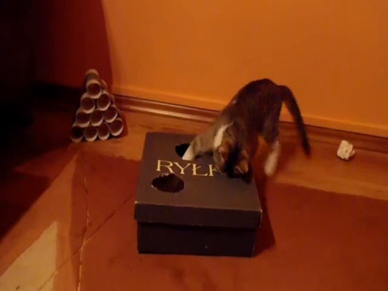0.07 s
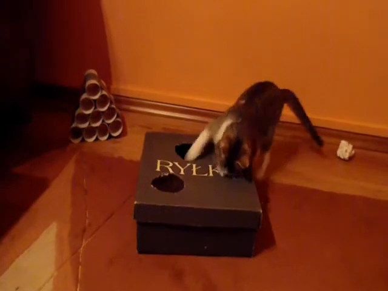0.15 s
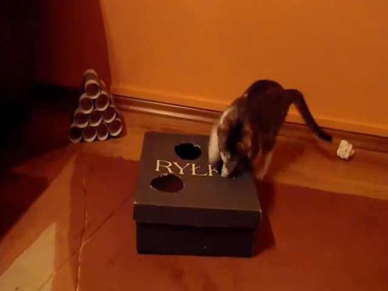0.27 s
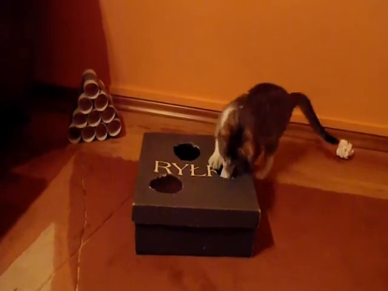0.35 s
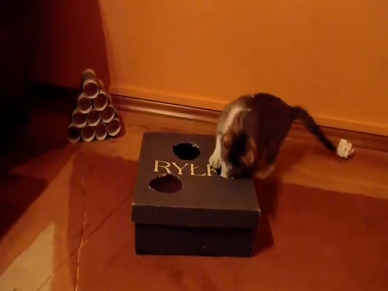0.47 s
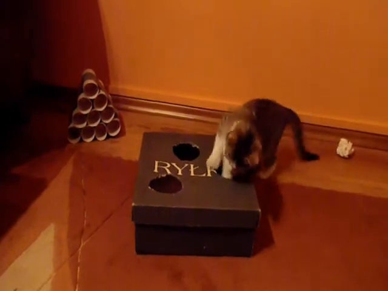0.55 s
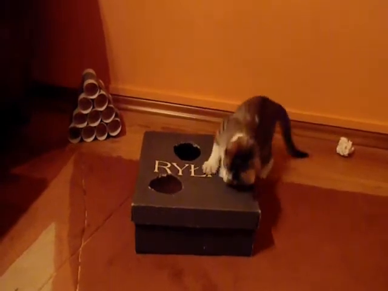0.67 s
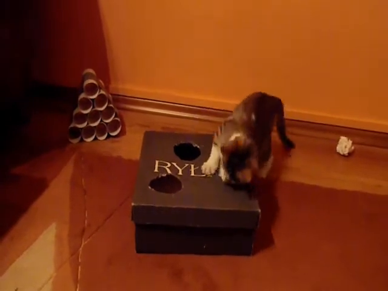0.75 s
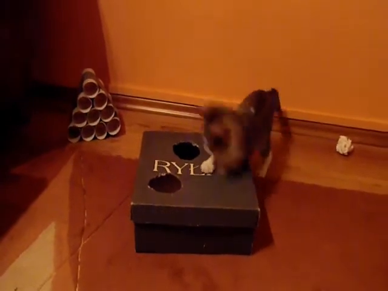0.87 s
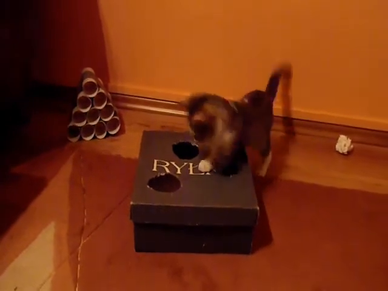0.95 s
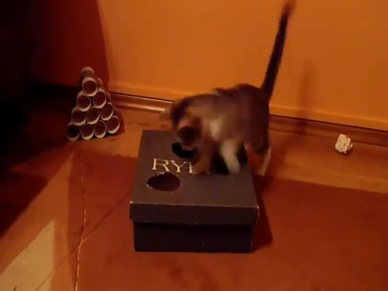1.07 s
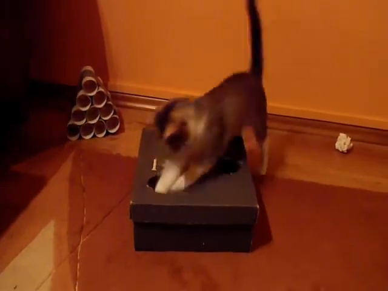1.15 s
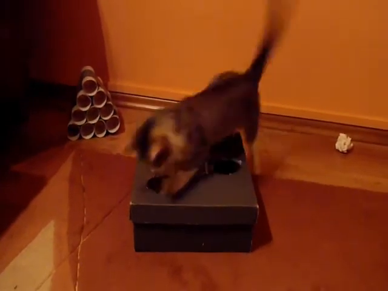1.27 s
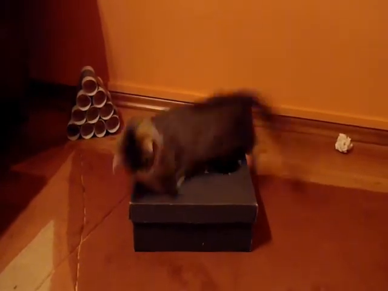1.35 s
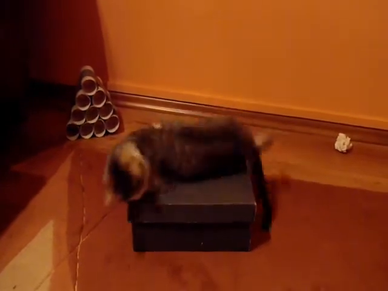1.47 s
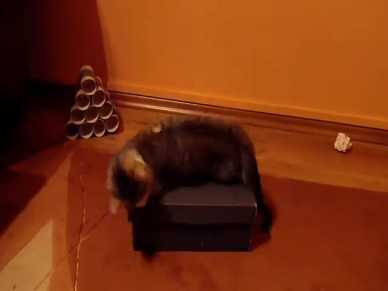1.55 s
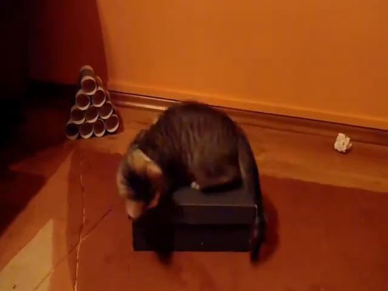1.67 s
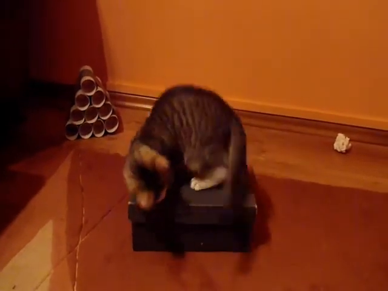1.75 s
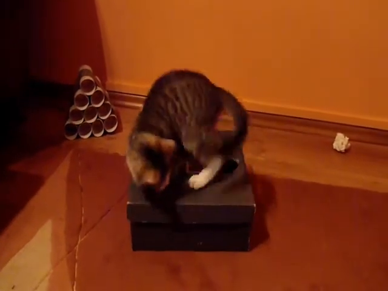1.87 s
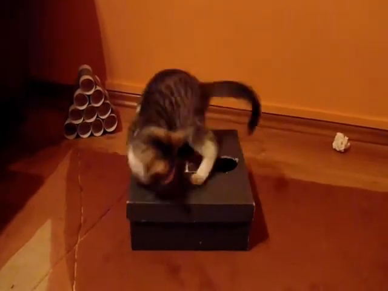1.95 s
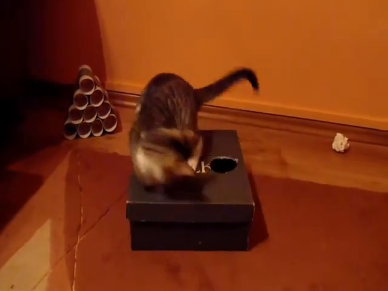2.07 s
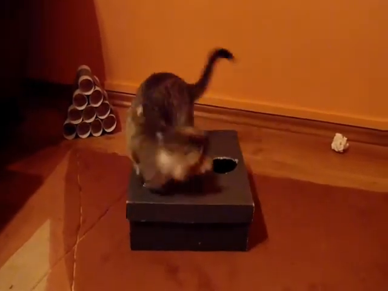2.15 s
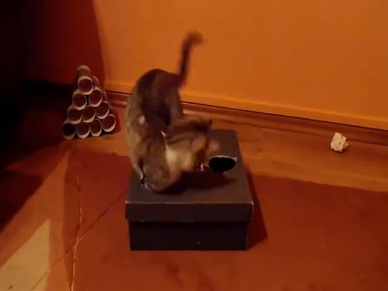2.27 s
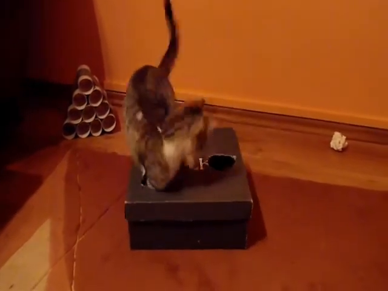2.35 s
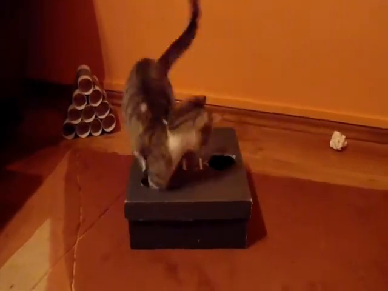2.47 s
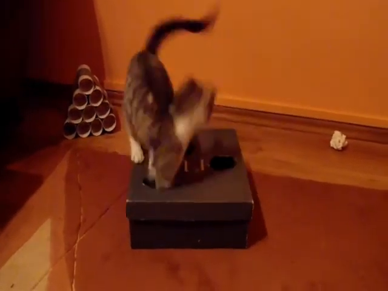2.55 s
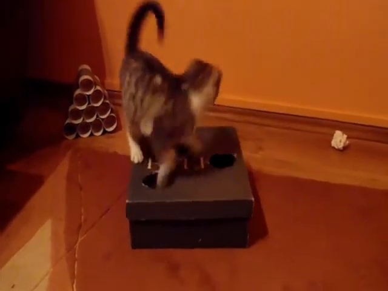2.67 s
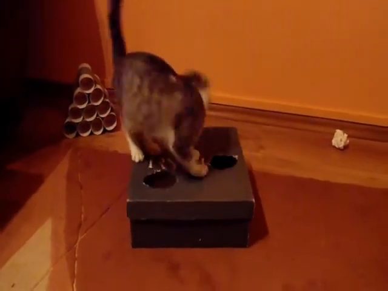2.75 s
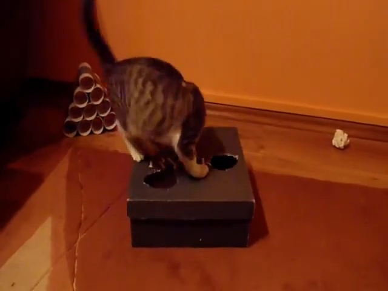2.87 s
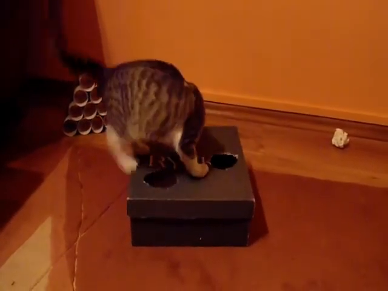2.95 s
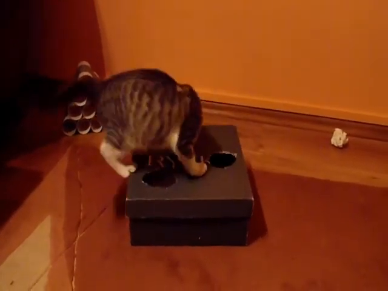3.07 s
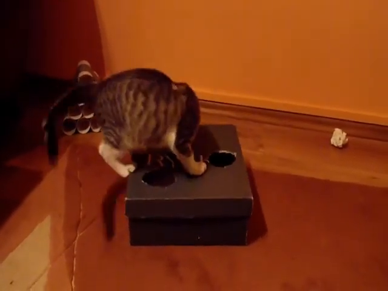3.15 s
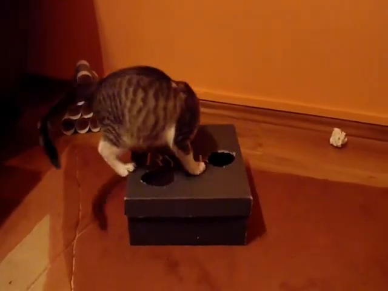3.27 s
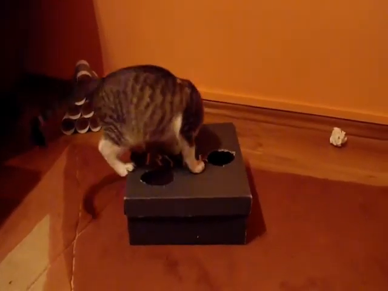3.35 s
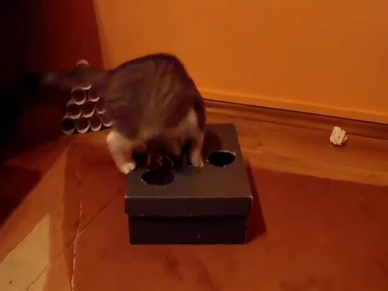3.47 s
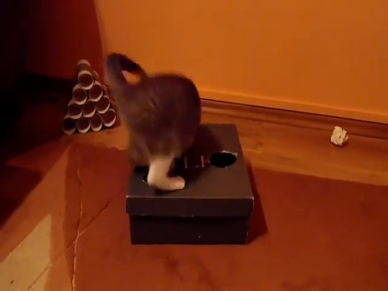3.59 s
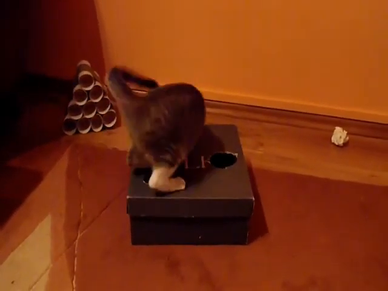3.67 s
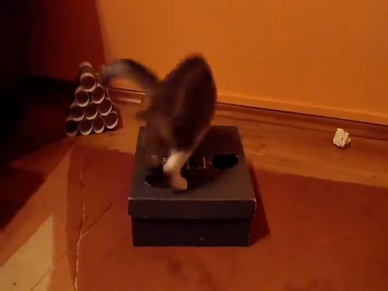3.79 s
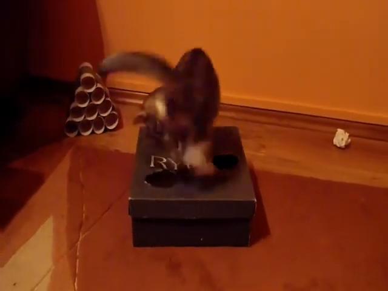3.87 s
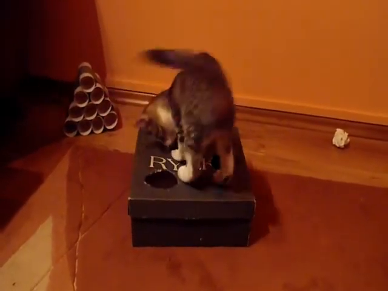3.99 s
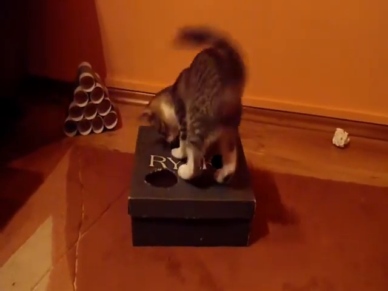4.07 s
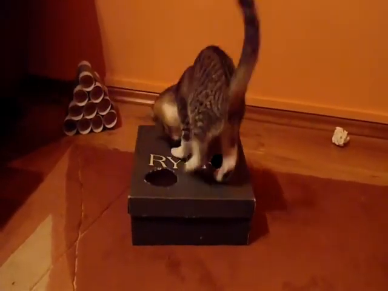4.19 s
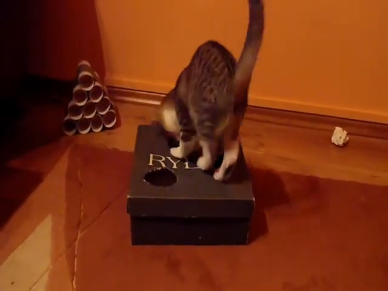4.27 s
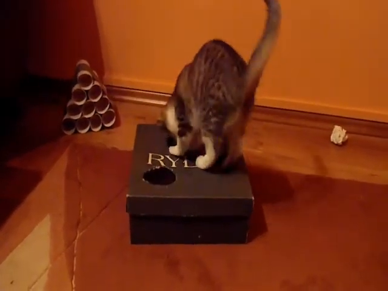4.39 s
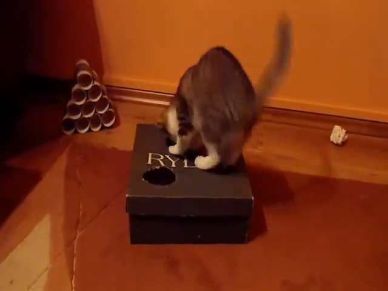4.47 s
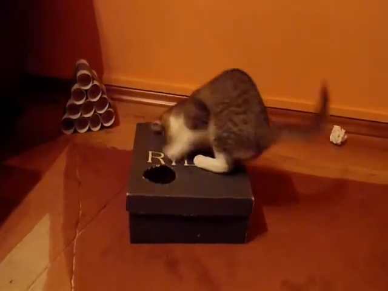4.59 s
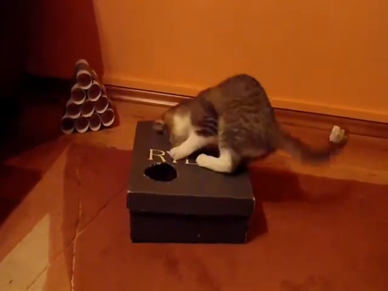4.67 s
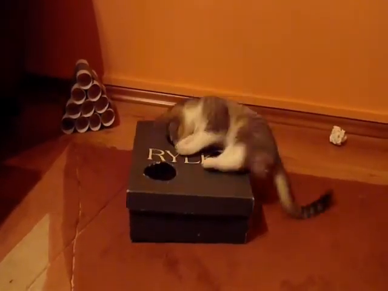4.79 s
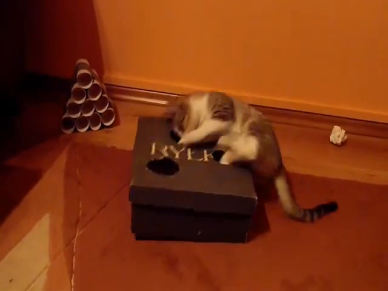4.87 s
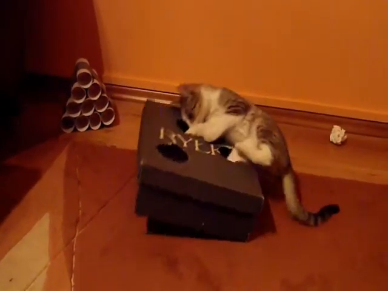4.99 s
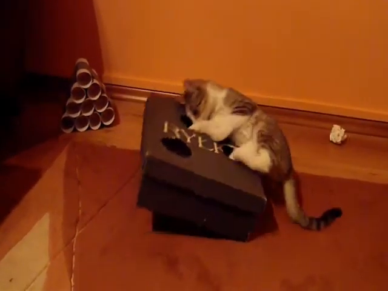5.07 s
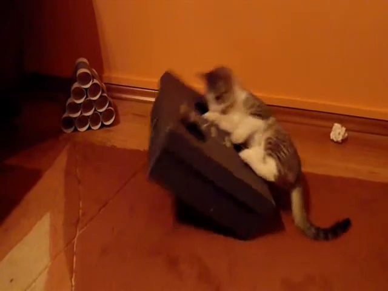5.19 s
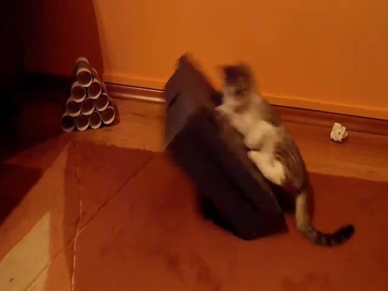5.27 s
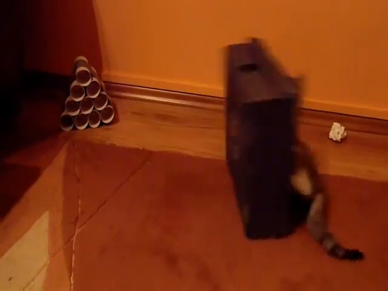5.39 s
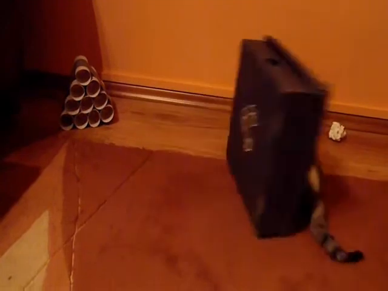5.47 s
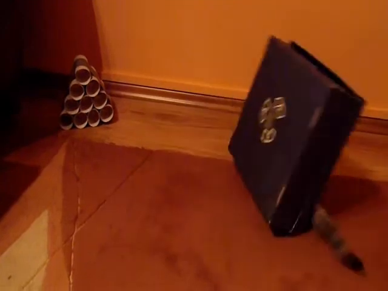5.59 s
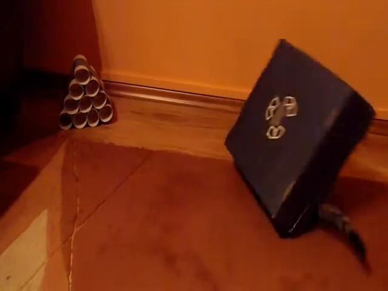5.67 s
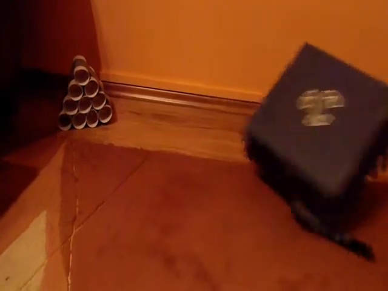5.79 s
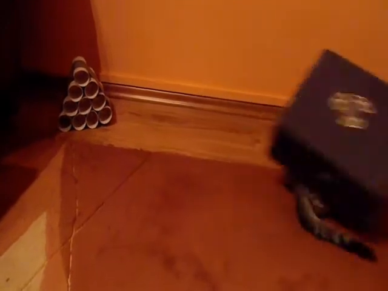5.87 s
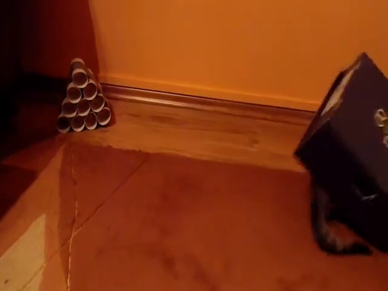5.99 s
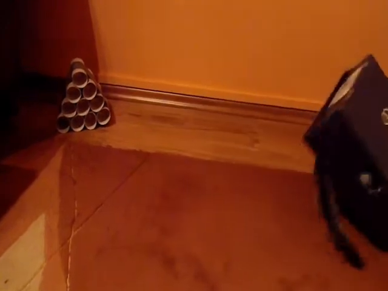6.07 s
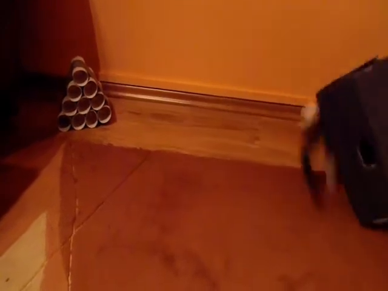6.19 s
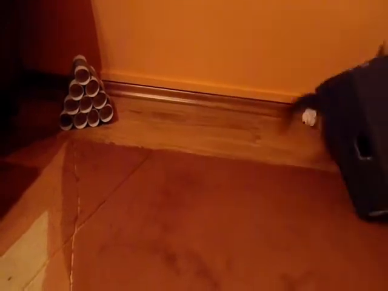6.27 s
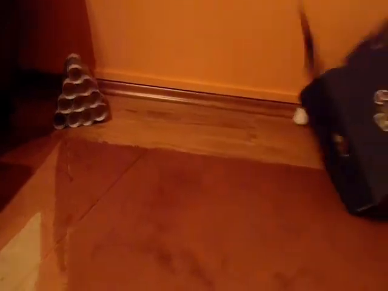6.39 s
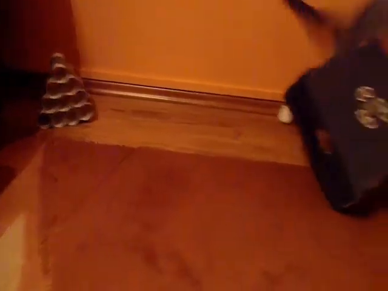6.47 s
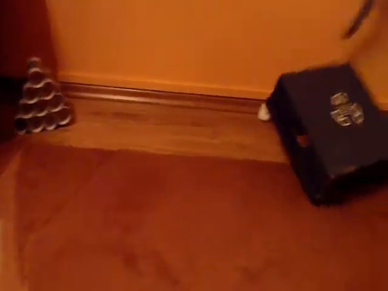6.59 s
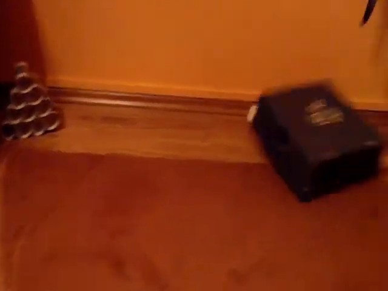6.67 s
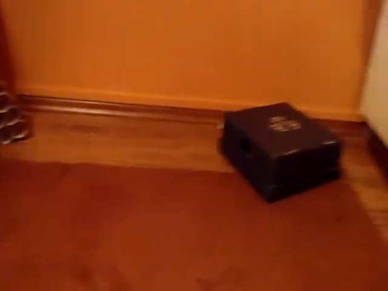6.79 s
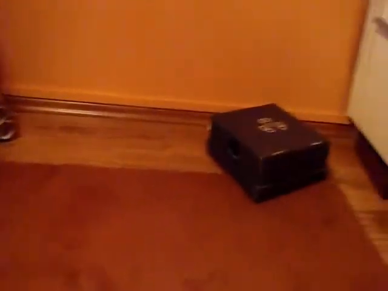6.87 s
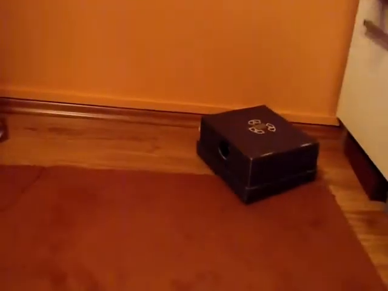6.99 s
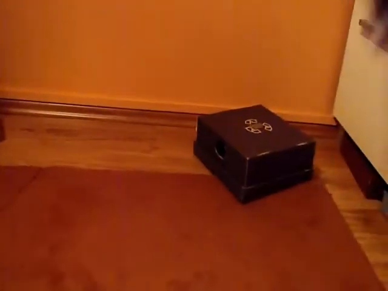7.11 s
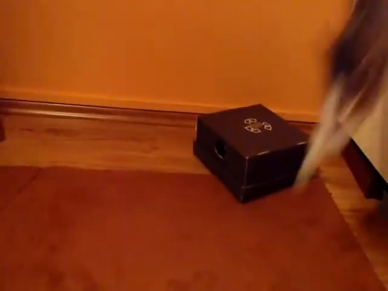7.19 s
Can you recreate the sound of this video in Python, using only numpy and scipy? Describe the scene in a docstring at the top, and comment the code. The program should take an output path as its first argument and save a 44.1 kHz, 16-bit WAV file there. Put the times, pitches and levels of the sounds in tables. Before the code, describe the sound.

Irregular hollow cardboard thuds, claw ticks and dry scratches over a faint drone, then crowded tumbling bumps and a final bright clank.

```python
"""A cat plays on a cardboard box in a small room, over an appliance's faint drone (resonant air noise) and room hush.
Fur and card rustle throughout as coloured, gritty noise, and the floor boards groan under the weight.
Soon paws thump the lid (damped modes of lid, air and walls), claws tick and scrape (shaped bursts of grit),
and hard edges snap; later the blows crowd together as the box tips over and bumps along the wooden floor.
At the very end a hard dish clanks in beating modes; a small camera microphone lifts the treble near 4.4 kHz."""
import sys
import numpy as np
from scipy import signal
from scipy.fft import rfft, irfft, next_fast_len
from scipy.io import wavfile
from scipy.ndimage import uniform_filter1d, map_coordinates

SR = 44100
rng = np.random.default_rng(int(sys.argv[2]) if len(sys.argv) > 2 else 0)


def master_out(mix):
    """Clip the mix to full scale and print it as 16-bit PCM to the path in sys.argv[1]."""
    frames = np.transpose(np.atleast_2d(mix))
    ceiling = np.clip(frames, -1, 1)
    pcm = np.round(ceiling * 32767).astype(np.int16)
    wavfile.write(sys.argv[1], SR, pcm)


N = 319284

# colour of rubbed and scraped card: (frequency [Hz], level [dB])
CARD_COLOUR = [(900, 13), (1400, 1.5), (2100, 2.5), (3000, -0.5), (3700, -5.5), (5000, -20)]
# colour of brushing fur, lifted by the microphone's own resonance: (frequency [Hz], level [dB])
FUR_COLOUR = [(2600, -28), (3500, -9), (4400, -0.5), (5300, -10), (6300, -19.5), (7500, -46)]
# colour of the top treble: (frequency [Hz], level [dB])
TOP_COLOUR = [(5500, -27), (6500, 1.5), (7500, 1.5), (8600, -6.5), (9600, -16.5)]


def amp(db):
    """Decibels to a linear gain."""
    return 10 ** (np.asarray(db) / 20)


def unit(x):
    """x scaled to an RMS of 1."""
    return x / np.sqrt(np.mean(x ** 2) + 1e-20)


def along(points, hz):
    """Read a curve of (frequency [Hz], value) points on a log frequency axis."""
    f, v = np.transpose(points)
    return np.interp(np.log(hz + 1), np.log(f + 1), v)


def curves(rows):
    """One value per sample for each column after the time."""
    s, *columns = np.transpose(rows)
    return [np.interp(np.arange(N) / SR, s, column) for column in columns]


def wobble(rate):
    """A smooth random curve through rate knots a second."""
    knots = rng.standard_normal(int(N * rate / SR) + 4)
    return map_coordinates(knots, [np.arange(N) * rate / SR])


def filtered(x, response):
    """x times a response of frequency."""
    m = next_fast_len(N + SR // 2)
    return irfft(rfft(x, m) * response(np.fft.rfftfreq(m, 1 / SR)), m)[:N]


def coloured(x, spectrum):
    """x through the given colour, 60 dB down outside its ends; white noise keeps its strength."""
    def response(hz):
        outside = (hz < spectrum[0][0]) | (hz > spectrum[-1][0])
        return unit(amp(along(spectrum, hz) - 60 * outside))
    return filtered(x, response)


def grit(rate, spread_db, share):
    """Noise with a share of single fibres that catch and let go, rate times a second."""
    caught = rng.random(N) < rate / SR
    catches = caught * amp(spread_db * rng.standard_normal(N)) * rng.standard_normal(N)
    share = np.clip(share, 0, 1)
    return np.sqrt(share) * unit(catches) + np.sqrt(1 - share) * rng.standard_normal(N)


def favour(modes, struck_hz, db_per_octave):
    """The spot struck favours the modes nearby: a loss in dB for each octave away."""
    return -db_per_octave * np.abs(np.log2(np.array(modes)[:, :1] / struck_hz))


def ring(modes, t, stretch, attack, scatter_db, detune, lean_db=0):
    """Damped modes; each blow lands elsewhere, so strengths and pitches may shift a little. Peak 1."""
    hz, db, t60 = np.transpose(modes)[:, :, None]
    chance = rng.standard_normal((2, len(modes), 1))
    fade = amp(db + lean_db + scatter_db * chance[0] - 60 * t / (t60 * stretch))
    shifted_hz = hz * (1 + detune * chance[1])
    x = np.sum(fade * np.sin(2 * np.pi * shifted_hz * t), axis=0) * (1 - np.exp(-t / attack))
    return x / np.abs(x).max()


def add(track, s, x):
    """Mix x in at s seconds."""
    track[round(s * SR):][:len(x)] += x


def contacts(events, shape, rate, share, stutter_db, stutter_rate, top_db):
    """Gritty noise under one shape per event, in the colours of card, fur and top; the top follows the treble."""
    sound, t = np.zeros((3, N + SR)), np.arange(SR // 3) / SR
    stutter = amp(-8 + stutter_db * wobble(stutter_rate))
    force = np.pad(stutter * grit(rate, 4.3, share), (0, SR))
    for s, db, card_hz, treble_db, *length in events:
        push = shape(t, *length) * force[round(s * SR):][:len(t)]
        # the patch of card under the claw rings briefly
        panel = signal.lfilter(*signal.iirpeak(card_hz, 4.5, SR), push)
        add(sound[0], s, amp(db) * (0.69 * push + 1.25 * panel))
        add(sound[1], s, amp(db + treble_db) * push)
        add(sound[2], s, amp(db + treble_db + top_db) * push)
    return sum(coloured(track[:N], colour) for track, colour in zip(sound, (CARD_COLOUR, FUR_COLOUR, TOP_COLOUR)))


def drone():
    """Air noise in an appliance's housing resonances, short plucked pulses near 738 Hz, and the room's hush."""
    # housing resonances: (frequency [Hz], width [Hz], level [dB])
    resonances = [(571, 64, -7.5), (738, 84, -1), (779.5, 31, -12.5), (1243, 134, -16), (1572, 140, -22.5)]
    # short pulses with a sharp onset and quick fade: (time [s], level before a 1.5 dB trim [dB])
    placed_pulses = [(0.233, -24.5), (0.336, -24.5), (0.384, -27), (0.452, -25), (0.506, -25),
                     (0.566, -26.5), (1.358, -27), (2.029, -27), (3.117, -28.5), (4.919, -22.5),
                     (5.15, -27), (5.25, -29), (6.552, -24)]
    # spectrum of the room's hush: (frequency [Hz], level per Hz [dB])
    hush_colour = [(12, -40), (20, -23), (368, -11.5), (458, -5), (556, -12.5), (638, -29), (731, 0.5),
                   (963, -13), (1230, -15), (1910, -25.5), (3700, -72), (4360, -38.5), (13100, -55.5),
                   (14200, -76)]

    def housing(f):
        return sum(amp(db) * (1j * f * w / (c * c - f * f + 1j * f * w)) ** 2 for c, w, db in resonances)

    flow = amp(1.56 * wobble(60)) * amp(1.8 * wobble(1.55))  # the air flow is unsteady, fast and slow
    hum = unit(filtered(flow * rng.standard_normal(N), housing))
    # more pulses at random times, mostly weaker: mean -32 dB, spread 5 dB before the trim
    random_pulses = [(rng.random() * N / SR, rng.normal(-32, 5)) for _ in range(22)]
    pulses, t = np.zeros(N + SR), np.arange(SR // 8) / SR
    for s, db in placed_pulses + random_pulses:
        envelope = amp(db - 1.5 - 60 * t / 0.058) * (1 - np.exp(-t / 0.0014))
        add(pulses, s, envelope * np.sin(2 * np.pi * rng.normal(738.4, 37) * t))
    hush = coloured(rng.standard_normal(N), hush_colour)
    return amp(-44.5) * hum + pulses[:N] + amp(-49) * hush


def rustle():
    """Fur brushes the card; the moving weight keeps box and floor grumbling."""
    # the cat's movement, before unevenness: (time [s], fur hiss [dB], card rustle [dB], box rumble [dB])
    movement = [(0.0, -68, -60, -51), (0.4, -68.5, -60.5, -49.5), (1.27, -60.5, -58, -48.5),
                (1.47, -48.5, -50.5, -43), (2.0, -63, -56, -47.5), (2.26, -51, -52, -43.5),
                (2.42, -62.5, -63.5, -51), (2.88, -61, -56, -45.5), (3.19, -74.5, -64, -54),
                (3.65, -65.5, -59.5, -51.5), (3.87, -47.5, -53.5, -46.5), (4.15, -71, -61.5, -51),
                (4.76, -60, -56, -51), (5.22, -66.5, -62, -53.5), (5.85, -57.5, -57, -49),
                (5.99, -49.5, -56, -35.5), (6.19, -48.5, -50, -43), (6.68, -61.5, -62, -46.5),
                (6.9, -48.5, -51, -39), (7.24, -52.5, -54, -45)]
    # the weight lands on the boards: (time [s], level [dB])
    landings = [(0.42, -52), (1.27, -44), (1.45, -41), (2.4, -48), (2.73, -40), (3.67, -45), (4.05, -52),
                (4.47, -60), (5.6, -50), (6.0, -49), (6.09, -44), (6.29, -53), (6.49, -36.5), (6.73, -41),
                (6.85, -42), (7.12, -37.5)]
    # spectra of floor boards and box: (frequency [Hz], level per Hz [dB])
    boards_colour = [(20, 3), (40, 0), (75, 2), (110, -0.5), (170, -33)]
    rumble_colour = [(50, -39), (100, -3.5), (156, 3.5), (250, -3), (330, 0), (450, -5), (900, -10),
                     (1500, -54)]
    boards_db, boards_swing_db, landing_s = -57, 3, 0.024  # landing_s: from peak down to 1/e

    fur_db, card_db, rumble_db = curves(movement)
    stroke = wobble(25) * np.clip((fur_db + 71.5) / 14, 0.2, 1)  # busy movement is more uneven
    brush = coloured(grit(1700, 2.8, 0.14), FUR_COLOUR)
    brush_top = 0.19 * coloured(rng.standard_normal(N), TOP_COLOUR)
    fur = amp(fur_db + 4.0 * stroke) * (brush + brush_top)
    card = amp(card_db + 3.1 * stroke) * coloured(grit(1200, 3.3, 0.11), CARD_COLOUR)
    lurch = sum(amp(db) * np.exp(-((np.arange(N) / SR - s) / landing_s) ** 2) for s, db in landings)
    groan = amp(boards_db + boards_swing_db * wobble(4.8))
    boards = (groan + lurch) * coloured(rng.standard_normal(N), boards_colour)
    rumble = amp(rumble_db + 3.2 * wobble(17)) * coloured(rng.standard_normal(N), rumble_colour)
    return fur + card + boards + rumble


def thumps():
    """A paw or the floor pushes the box: lid, enclosed air and walls answer as damped modes."""
    # soft blows, levels before a small make-up gain: (time [s], level [dB], strongest lid pitch [Hz],
    # air boom re lid [dB], wall knock re level [dB], strongest wall pitch [Hz])
    blows = [(0.391, -32.5, 277, -3.5, -9, 750), (0.663, -35.5, 264, -6, 7.5, 1070),
             (0.872, -39.5, 335, -19, 3, 770), (1.262, -25.5, 200, -0.5, -4, 720),
             (1.397, -19.5, 298, -4, -8, 970), (1.418, -22.5, 282, 0, -1, 840),
             (1.443, -12.5, 300, -7, -7.5, 910), (1.49, -23.5, 318, -23, -5.5, 620),
             (1.514, -32, 330, 1.5, -3, 800), (1.651, -28.5, 216, -7, 7.5, 800),
             (1.681, -33.5, 380, 2, -7, 540), (1.712, -38, 230, -6, -19, 700),
             (1.772, -27.5, 297, -2.5, -23, 760), (2.096, -40, 206, 0, 18.5, 990),
             (2.108, -41.5, 402, -9, 17, 1020), (2.244, -14, 255.6, -16.5, -6.5, 790),
             (2.315, -38, 355, 3, 6.5, 755), (2.562, -34, 242, 2.5, -1.5, 730),
             (2.786, -40.5, 234, 2, 12.5, 770), (2.86, -35.5, 202, 15, -1.5, 480),
             (3.664, -35, 306, 3, -7, 770), (3.72, -23.5, 291, -21, -10, 840),
             (3.901, -16.5, 288, -35, -6, 810), (4, -23, 208, -4, -11, 770),
             (4.498, -28, 320, -5, -14, 770), (4.876, -35.5, 200, 2.5, -19, 680),
             (4.889, -26.5, 296, -24, -29, 990), (5.531, -27.5, 296, -23, 1, 790),
             (5.801, -36.5, 221, 3, -4, 800), (5.83, -19.5, 209, -11, -3.5, 870),
             (5.85, -22.5, 297, -2.5, 2.5, 940), (5.973, -23.5, 197, 2.5, 6, 670),
             (6.054, -20, 272, -5, -0.5, 1010), (6.167, -24, 233, -28, -16, 750),
             (6.338, -20.5, 253, -26, -6, 724), (6.413, -31, 238, -5, 9, 690),
             (6.437, -21.5, 247, -11, -1.5, 586), (6.479, -27.5, 267, -12, -8, 730),
             (6.649, -34, 270, -20, -15, 600), (6.712, -18, 234, -11, -5.5, 740),
             (6.815, -9, 228, -20, 0, 780), (6.828, -22, 253, 0.5, 5.5, 560),
             (6.869, -20, 288, -23, -8, 515), (6.907, -16, 230, -13, -7, 595),
             (6.919, -22, 242, -17, -9, 700), (7.068, -34, 260, -16, 4.5, 730),
             (7.196, -26.5, 372, -8, 0.5, 520)]
    # modes of lid, enclosed air and walls: (frequency [Hz], relative level [dB], t60 before stretch [s])
    lid_modes = [(207, 1.5, 0.064), (228.2, 5, 0.074), (252.7, -1.5, 0.1), (295.7, 0.5, 0.09),
                 (325.6, -6, 0.15), (415, -8, 0.19)]
    air_modes = [(158.6, 19, 0.083), (160, -15.5, 0.44), (124, -17, 0.035)]
    wall_modes = [(448, 0.5, 0.032), (527.5, 1.5, 0.079), (608, -0.5, 0.1), (687, 5, 0.018),
                  (768, 3, 0.046), (868, -2.5, 0.094), (1010, -0.5, 0.076), (1059, -8.5, 0.06),
                  (1307, 7, 0.015), (1428, -8.5, 0.073), (1580, -12, 0.037)]

    out, t = np.zeros(N + SR), np.arange(SR // 2) / SR
    for s, db, lid_hz, boom_db, knock_db, wall_hz in blows:
        stretch = 0.96 * np.exp(-0.02 * (db + 29.5))  # a harder paw presses longer and damps
        lid = ring(lid_modes, t, stretch, 0.0042, scatter_db=2.0, detune=0.032,
                   lean_db=favour(lid_modes, lid_hz, 30))
        boom = amp(boom_db) * ring(air_modes, t, stretch, 0.0029, scatter_db=3.5, detune=0.025)
        knock = ring(wall_modes, t, stretch, 0.0011, scatter_db=0.0, detune=0.053,
                     lean_db=favour(wall_modes, wall_hz, 12))
        # rough contact smears the knock
        contact = amp(-60 * np.arange(900) / SR / 0.016) * rng.standard_normal(900)
        knock = np.convolve(knock[:6000], contact)
        add(out, s, amp(db + 1.5) * (lid + boom))
        add(out, s, amp(db + knock_db + 0.5) * knock / np.abs(knock).max())
    # a small box radiates no deep bass: second-order high-pass at 75 Hz
    return filtered(out[:N], lambda f: (1j * f / (75 + 1j * f)) ** 2)


def ticks():
    """A claw or edge makes a sharp crack with a quickly dying rasp behind it."""
    # claw and edge contacts: (time [s], level before colouring [dB], card ring [Hz], relative treble [dB])
    taps = [(0.391, -40.5, 1390, -8.5), (0.6461, -25, 2740, -6.5), (0.6703, -23.5, 1420, -3),
            (0.7808, -30, 2760, -11), (0.8731, -31.5, 3230, -7), (1.2607, -28, 1490, -9.5),
            (1.291, -28, 2030, -3.5), (1.3748, -33, 1590, -6), (1.4113, -12, 3330, -12.5),
            (1.4413, -16, 1300, -4.5), (1.634, -26.5, 3140, -5), (1.6545, -25, 1790, -25),
            (1.9426, -28.5, 1380, -8), (2.0936, -20.5, 1360, -12.5), (2.2441, -22, 1430, -2.5),
            (2.3156, -27.5, 2590, -3.5), (2.562, -37, 1540, -8), (2.7885, -21.5, 1720, -11),
            (2.859, -37, 1450, -4), (3.6631, -35, 1410, -8), (3.6993, -22, 1340, -10),
            (3.7042, -25.5, 2010, -11), (3.7908, -36.5, 3660, 14), (3.918, -44, 1700, 14),
            (4.3107, -47.5, 3560, 3.5), (4.369, -49, 1590, -1), (4.43, -47, 1500, 3),
            (4.4788, -37.5, 1880, -6), (4.8873, -18, 3160, -4), (5.8313, -19, 1290, -1),
            (5.9524, -40, 3610, 10), (5.9747, -16, 1910, -8), (6.0512, -18, 2070, -7),
            (6.4127, -34, 1410, 4), (6.4427, -27, 1560, -4), (6.595, -52, 1500, 10),
            (6.6763, -50, 1490, 12.5), (6.7076, -22, 1590, -9.5), (6.7958, -25, 3200, 0.5),
            (6.8074, -13.5, 2620, -4.5), (6.8118, -12.5, 2140, -8.5), (6.8194, -17, 2090, -18),
            (6.828, -24.5, 1450, -9), (6.8976, -18, 1470, -16), (7.0563, -30.5, 1610, -19),
            (7.194, -21, 1580, -10.5)]

    def shape(t):
        rasp, crack = amp(-60 * t / 0.071), 0.29 * amp(-60 * t / 0.0044)
        return (rasp + crack) * (1 - np.exp(-t / 0.00059))

    return contacts(taps, shape, 4000, 0.77, stutter_db=1.53, stutter_rate=150, top_db=-19)


def scrapes():
    """A stroke over the card swells, holds and lets go, stuttering on the fibres."""
    # strokes of claws or pads: (start time [s], level before colouring [dB], card ring [Hz],
    # relative treble [dB], length before release [s])
    strokes = [(0.685, -42, 3340, -2.5, 0.055), (0.748, -40, 2800, -0.5, 0.05),
               (1.1, -51.5, 1510, -3, 0.03), (1.155, -46.5, 3270, -2, 0.022),
               (1.265, -35.5, 3170, -10, 0.027), (1.305, -42.5, 3270, 2, 0.041),
               (1.46, -39, 1600, -4.5, 0.071), (1.735, -34, 3180, -3.5, 0.073),
               (1.95, -39.5, 3640, -3, 0.042), (2.115, -31, 1730, -10, 0.02),
               (2.135, -26.5, 2820, -8.5, 0.033), (2.19, -47, 2500, -13, 0.03),
               (2.334, -42.5, 2550, -2, 0.092), (2.58, -51.5, 1700, -0.5, 0.11),
               (2.95, -56.5, 1480, 3, 0.17), (3.71, -37.5, 2240, 3, 0.029), (3.735, -33, 1500, -3, 0.025),
               (3.8, -53, 3600, 3, 0.083), (3.924, -52.5, 1460, 7, 0.032), (3.98, -48, 1550, 5.5, 0.051),
               (4.14, -47, 1450, -10, 0.037), (4.49, -46, 1400, 0, 0.061), (4.54, -44, 2750, -2, 0.083),
               (4.83, -48.5, 3400, -4.5, 0.05), (4.912, -42.5, 2360, -5, 0.039), (5.47, -58, 1600, 9, 0.35),
               (5.797, -37, 1600, -1.5, 0.091), (5.99, -31, 1990, -16, 0.027), (6.07, -46, 1700, -6, 0.059),
               (6.194, -42, 2800, 3.5, 0.059), (6.25, -41, 3500, 5.5, 0.044), (6.32, -43, 3700, 5.5, 0.038),
               (6.42, -38, 1560, 3.5, 0.055), (6.844, -35, 1800, -15, 0.06), (6.95, -44, 1410, -5, 0.017),
               (7.07, -37, 1600, -18, 0.025)]

    def shape(t, length):
        swell = 1 - np.exp(-(t / (0.25 * length)) ** 2)
        release = np.exp(-np.maximum(t - length, 0) / 0.016)
        return swell * release

    return contacts(strokes, shape, 1200, 0.35, stutter_db=2.5, stutter_rate=70, top_db=-18)


def snaps():
    """A hard edge cracks against card, floor or dish: the brightest edge of the hardest contacts."""
    # cracks, before attack and colouring: (time [s], level before a 4 dB trim [dB], t60 [s])
    cracks = [(1.4113, -52, 0.05), (1.4408, -46, 0.04), (3.7908, -60, 0.09), (4.8873, -55, 0.08),
              (5.8313, -62, 0.06), (5.9747, -58, 0.06), (6.0512, -62, 0.052), (6.4427, -60, 0.05),
              (6.7958, -53, 0.1), (6.8074, -46.5, 0.06), (6.8115, -38.5, 0.05), (7.198, -52, 0.12)]
    # colour of the crack: (frequency [Hz], level [dB])
    crack_colour = [(8800, -22.5), (9800, 3), (12500, -2.5), (13800, -13.5), (14600, -43)]

    s, db, t60 = np.transpose(cracks)[:, :, None]
    t = np.arange(N) / SR - s
    attack = 1 - np.exp(-np.maximum(t, 0) / 0.0026)  # silent before the crack
    envelope = np.sum(amp(db - 4 - 60 * np.abs(t) / t60) * attack, axis=0)
    push = envelope * grit(4000, 3, 0.4)
    return coloured(push, crack_colour) + amp(7.5) * coloured(push, TOP_COLOUR)


def clank():
    """One blow on a hard dish: energy passes slowly into some modes, and twin modes beat."""
    # the blow: (time [s], level [dB])
    strike_s, strike_db = (7.195, -14.5)
    # dish modes: (frequency [Hz], relative level [dB], t60 [s], build-up [s], twin spacing [Hz])
    dish_modes = [(474, -7, .1, .002, 45), (1480, -10, .2, .002, 0), (1870, -16, .08, .002, 0),
                  (2030, -7, .03, .001, 0), (2480, -12, .4, .022, 0), (2950, -12, .2, .003, 35),
                  (3850, -11, .4, .022, 0), (4130, -10, .06, .003, 0), (4260, 3.5, .15, .011, 16),
                  (4700, -18, .04, .002, 0), (5780, -16, .15, .004, 20), (6970, -26, .09, .003, 0),
                  (8250, -34, .1, .003, 0), (12800, -34, .05, .003, 0)]

    out, t = np.zeros(N + SR), np.arange(SR // 4) / SR
    hz, db, t60, rise, twin = np.transpose(dish_modes)[:, :, None]
    # it rocks on the floor, the pitches tremble
    waver = uniform_filter1d(rng.standard_normal((len(hz), len(t))), 150, axis=1)
    phase = 2 * np.pi * (hz * t + rng.random(hz.shape) + .004 * np.cumsum(waver, axis=1))
    build_up = 1 - np.exp(-(t / rise) ** 2)
    size = amp(db - 60 * t / t60) * build_up * np.cos(np.pi * twin * t)
    add(out, strike_s, amp(strike_db) * np.sum(size * np.sin(phase), axis=0))
    return out[:N]


def room(x):
    """A noise tail for the room's answer, in which each frequency dies at its own speed."""
    # decay of the room: (frequency [Hz], t60 [s])
    decay = [(100, 0.39), (500, 0.32), (2000, 0.22), (5000, 0.23), (12000, 0.12)]

    hz, t, z = signal.stft(rng.standard_normal(SR // 2), SR, nperseg=256)
    fade = amp(-60 * t / along(decay, hz)[:, None])
    tail = signal.istft(z * fade, SR, nperseg=256)[1]
    delayed = np.pad(x, (250, 0))  # the answer starts 250 samples late
    return signal.fftconvolve(delayed, tail / np.linalg.norm(tail))[:N]


def scene():
    """Blows, contacts and dish with their room, over rustle and drone."""
    low = thumps()
    high = ticks() + scrapes() + snaps()
    dish = clank()
    answer = amp(-7.5) * room(low) + amp(-9.5) * room(high) + amp(-13) * room(dish)
    return (low + high + dish + answer + rustle() + drone())[None]


def record(dry):
    """The microphone hisses faintly; the camera keeps nothing above its band limit."""
    # the microphone's own noise: (frequency [Hz], level [dB])
    hiss_colour = [(3000, -19), (6000, -3), (9000, 4.5), (13000, 1), (14300, -10)]
    band_limit_hz = 14300

    hiss = amp(-81.5) * coloured(rng.standard_normal(N), hiss_colour)
    return filtered(dry[0] + hiss, lambda hz: hz < band_limit_hz)[None]


dry = scene()
out = record(dry)
master_out(out)
```